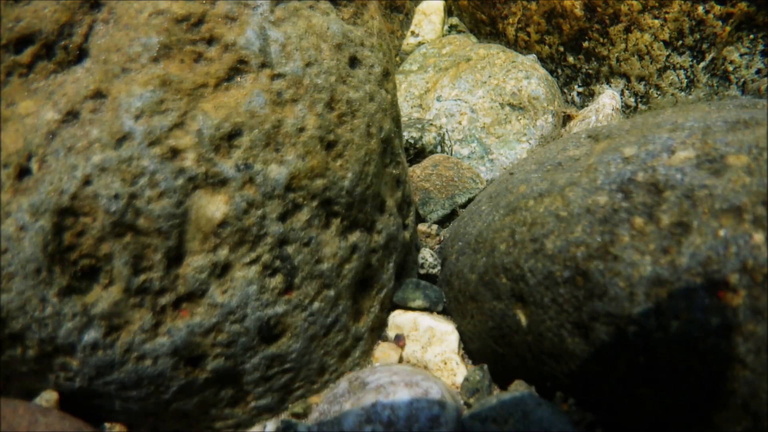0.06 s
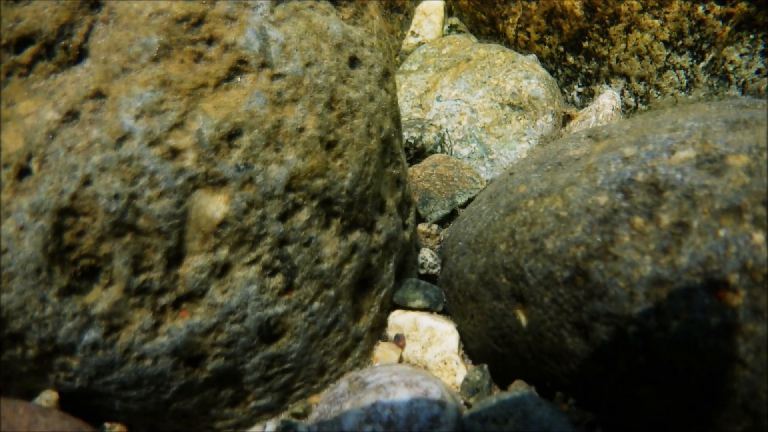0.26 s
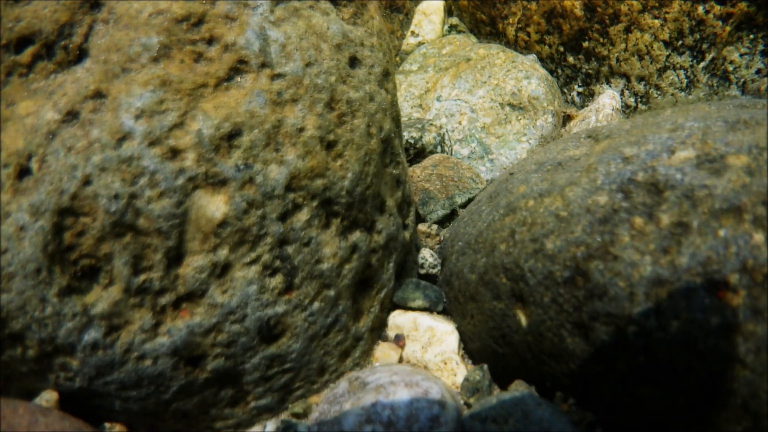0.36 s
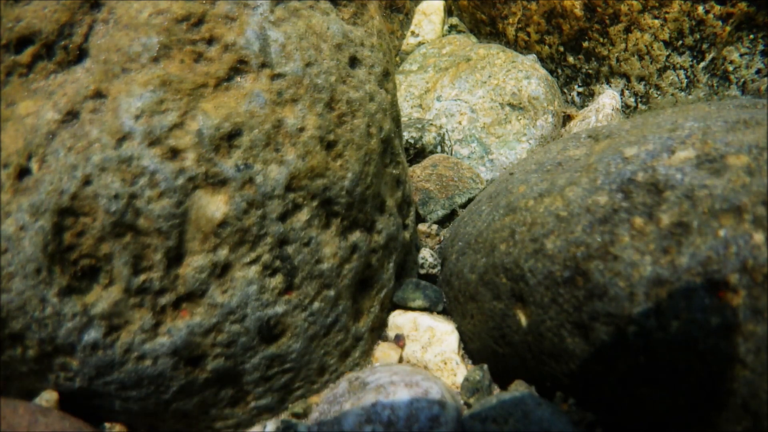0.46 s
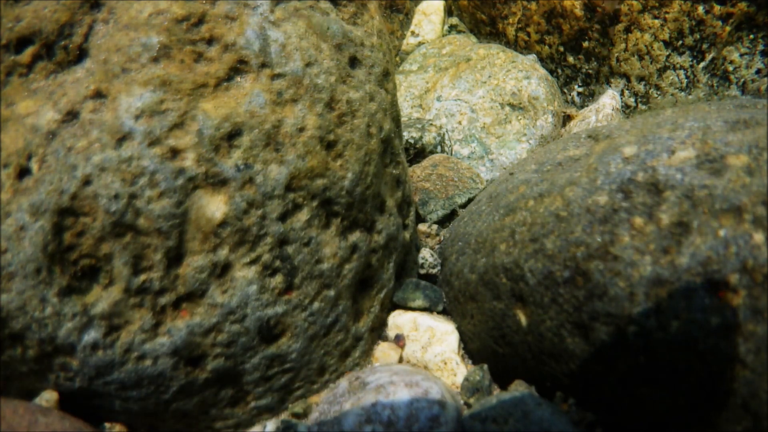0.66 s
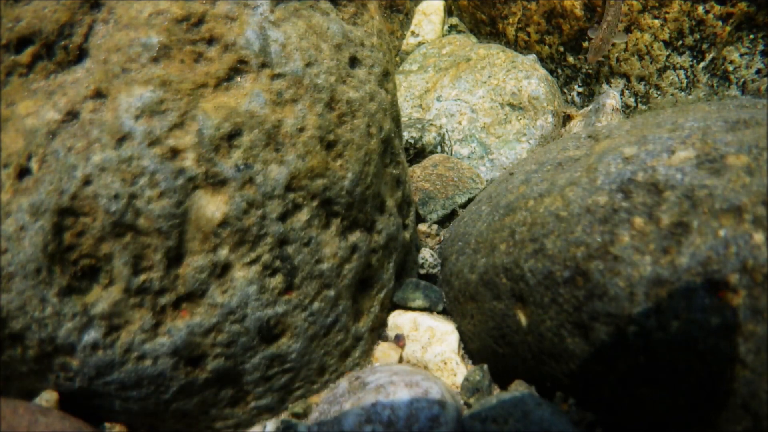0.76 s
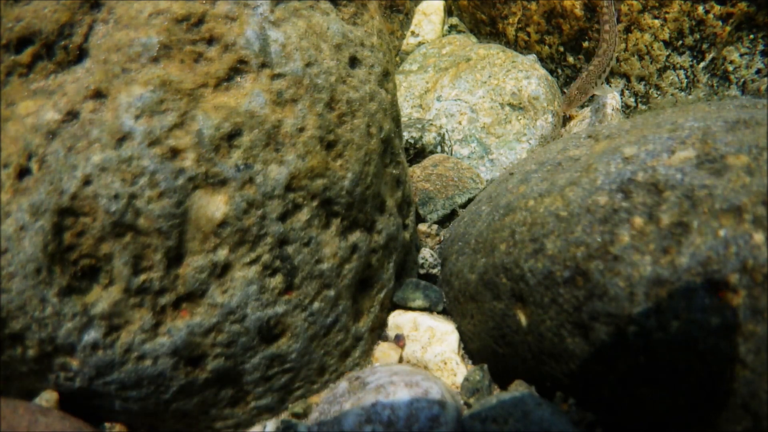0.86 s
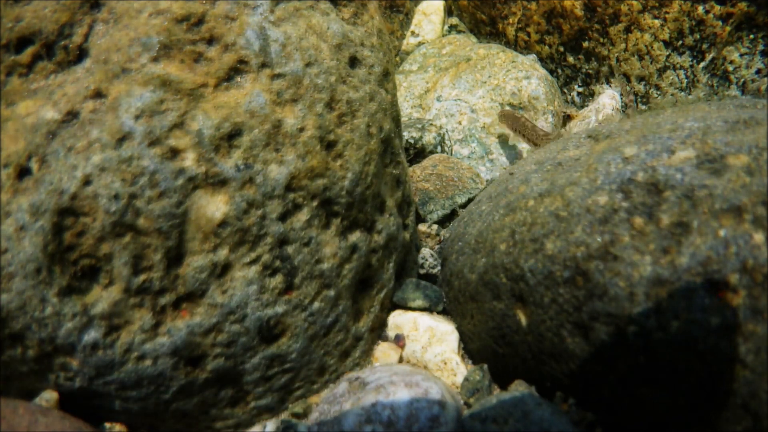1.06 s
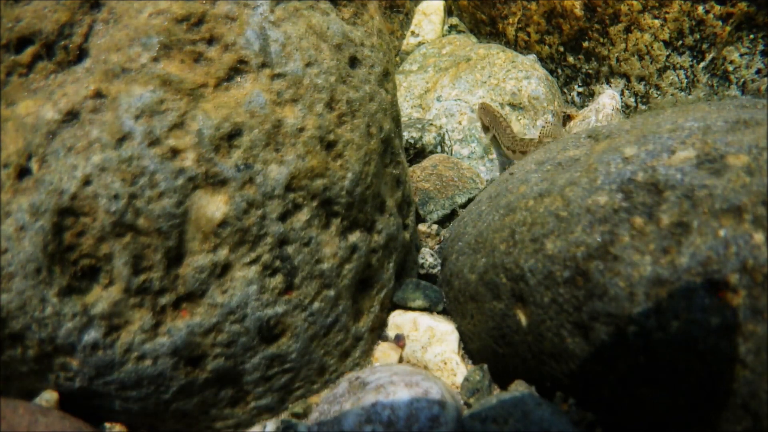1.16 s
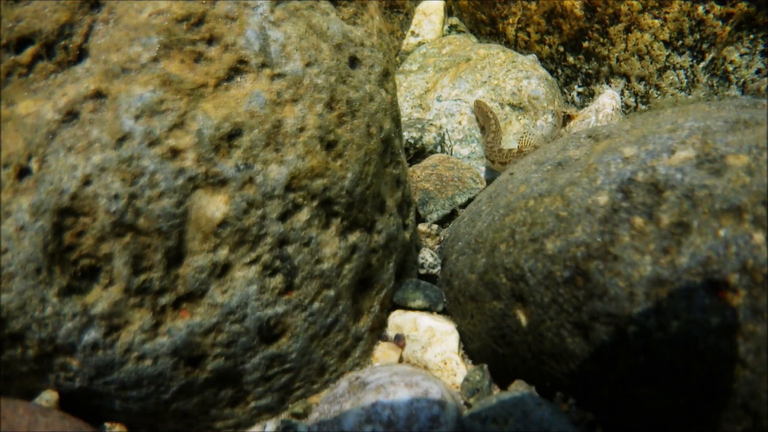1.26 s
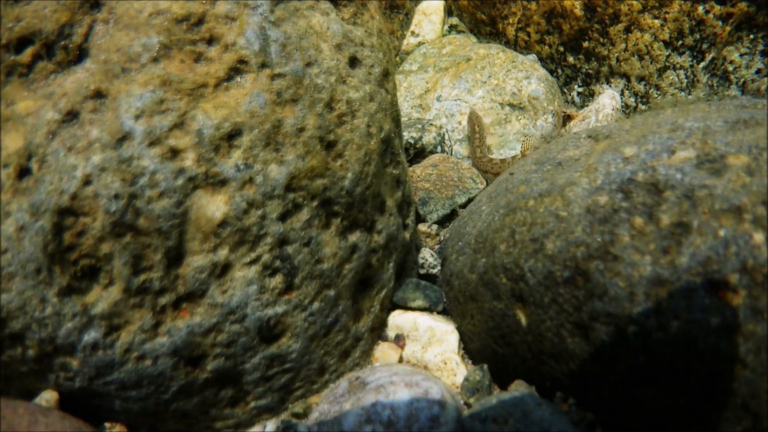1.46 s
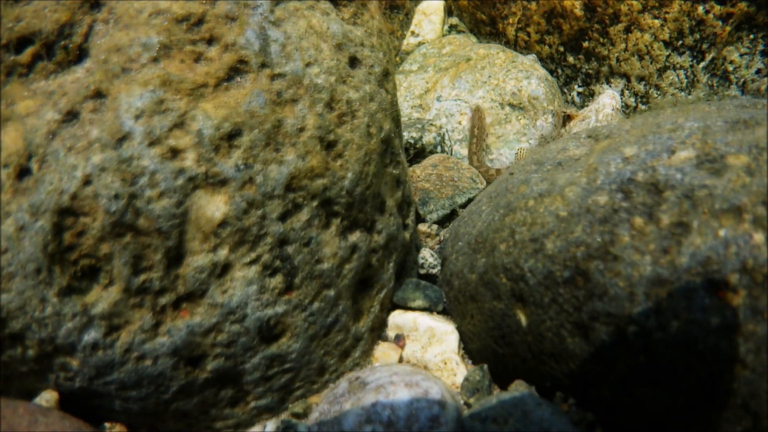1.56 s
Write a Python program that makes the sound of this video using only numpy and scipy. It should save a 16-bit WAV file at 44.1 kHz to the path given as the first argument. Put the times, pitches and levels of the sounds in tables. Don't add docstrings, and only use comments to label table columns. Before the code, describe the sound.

Stream current flows underwater, a steady, dull low rush with wobbling gurgles pressed close against enclosed stereo microphones. At about 0.22 seconds a stone knocks the housing hard with a short, deep thump. From 0.5 to 0.6 a looser rattle makes the thin shell ring briefly. The level drops slightly near 0.8; soft bumps, faint hiss and very weak high whines remain until about 1.6.

```python
import sys
import numpy as np
from scipy import signal
from scipy.fft import rfft, irfft, next_fast_len
from scipy.io import wavfile
from scipy.ndimage import uniform_filter1d, map_coordinates

SR = 44100
rng = np.random.default_rng(int(sys.argv[2]) if len(sys.argv) > 2 else 0)


def decibels_to_gain(level_db):
    exponent = np.asarray(level_db, float) / 20
    return 10 ** exponent


def dump(signal):
    limited = np.clip(np.atleast_2d(signal).T, -1, 1)
    pcm = np.round(limited * 32767).astype(np.int16)
    wavfile.write(sys.argv[1], SR, pcm)


N = 70560

# time in seconds, level in dB.
FLOW = [(0, -45.5), (.4, -44.5), (.8, -45), (1.2, -45), (1.6, -43)]
# frequency in Hz, density in dB per Hz.
RUSH_SPECTRUM = [(25, -11), (90, -21), (190, -8), (255, 1), (330, -1.5), (560, -7), (700, -23.5),
                 (1200, -43.5)]
# frequency in Hz, left-right likeness from -1 to 1.
RUSH_ALIKE = [(60, 1), (130, 0.77), (290, 0.95), (640, 0.66), (900, 0.17)]
# highest crest in seconds, peak in dB, pitch in Hz, rise and fall in seconds.
BUMPS = [(.001, -34, 240, .002, .006), (.085, -36, 330, .004, .007), (.1078, -35, 400, .007, .005),
         (.2105, -30, 250, .007, .008), (.2233, -21, 253, .0058, .004), (.2312, -20.5, 253, .008, .0085),
         (.2245, -36, 435, .004, .012), (.4912, -29, 295, .012, .006), (.5075, -31, 250, .008, .003),
         (.5225, -33, 235, .007, .006), (.5353, -26, 226, .01, .004), (.5395, -31, 450, .005, .008),
         (.557, -29, 300, .008, .009), (.583, -26, 312, .01, .007), (.6935, -36, 270, .003, .006),
         (.713, -37, 320, .007, .004), (.7222, -39, 280, .003, .006), (.7825, -38, 300, .003, .007),
         (.801, -38, 300, .004, .005), (1.097, -35.5, 340, .009, .007), (1.481, -36, 480, .006, .006),
         (1.574, -34, 300, .012, .006), (1.265, -37, 270, .008, .01)]
# start in seconds, thump level in dB, shell ring level in dB.
CONTACTS = [
    (.2216, -29, -38),
    (.5268, -45, -33),
    (.568, -42, -50),
]
# frequency in Hz, level in dB, 60 dB decay in seconds.
THUMP_MODES = [(98, -2, 0.063), (130, -0.5, 0.064), (168, 4.5, 0.063)]
# frequency in Hz, level in dB, 60 dB decay in seconds.
SHELL_MODES = [(915, 0, .045), (1050, -2, .04), (780, -5, .035), (1180, -8, .03)]
# frequency in Hz, density in dB per Hz.
HISS_SPECTRUM = [(440, -36), (750, 0.5), (950, -1.5), (1900, -7), (3900, -15.5), (7000, -15.5),
                 (11600, -13), (15000, -16.5)]
# frequency in Hz, left-right likeness from -1 to 1.
HISS_ALIKE = [(750, -0.18), (1400, 0.059), (5000, -0.14)]
# frequency in Hz, level in dB rms.
WHINES = [(11329, -81), (12000, -88), (12546, -88)]

RUSH_PAN_DB, BUMP_PAN_DB, THUMP_PAN_DB, HISS_PAN_DB = -1.1, -.7, -6, -1.5
GURGLE_DB, GURGLE_HZ, GURGLE_SPREAD = -7, 337.8, 0.282
GURGLE_CYCLES, GURGLE_SIZES_DB, GURGLE_RISE = 2.5, 1.5, 0.098
ROCK_DB, ROCK_LATE_S = -14, .004
THUMP_RISE_S, SHELL_RISE_S = .0015, .002
SHELL_LEFT = -.15
HISS_DB = -54
STEP_S, STEP_DB, STEP_TAKES_S = .82, -3.4, .015
LOW_CUT_HZ, TOP_HZ, TOP_FADE_HZ = 92, 15480, 170


def unit(x):
    return x / np.sqrt(np.mean(x ** 2) + 1e-20)


def along(points, hz):
    f, v = np.transpose(points)
    return np.interp(np.log(hz + 1), np.log(f + 1), v)


def wobble(rate):
    knots = rng.standard_normal(int(N * rate / SR) + 4)
    return map_coordinates(knots, [np.arange(N) * rate / SR])


def pan(db):
    return decibels_to_gain(np.array([[db / 2], [-db / 2]]))


def noise(spectrum, alike, patchy_db):
    z = signal.stft(rng.standard_normal((2, N)), nperseg=1024)[2]
    field = uniform_filter1d(rng.standard_normal(z.shape[1:]), size=5, axis=0)
    field = uniform_filter1d(field, size=4, axis=1)
    pair = signal.istft(z * decibels_to_gain(patchy_db * unit(field)), nperseg=1024)[1][:, :N]
    m = next_fast_len(N + 8192)
    hz = np.fft.rfftfreq(m, 1 / SR)
    turn = np.arccos(np.clip(along(alike, hz), -1, 1)) / 2
    coloured = rfft(pair, m) * decibels_to_gain(along(spectrum, hz))
    mid, side = irfft(coloured * [np.cos(turn), np.sin(turn)], m)[:, :N]
    return unit(np.array([mid + side, mid - side]))


def current():
    flow_db = np.interp(np.arange(N) / SR, *np.transpose(FLOW))
    flow_db = flow_db + 0.35 * wobble(6.3) + 0.72 * wobble(29.94)
    rush = noise(RUSH_SPECTRUM, RUSH_ALIKE, patchy_db=0.83)
    water = unit(rush + decibels_to_gain(GURGLE_DB) * gurgles(count=600))
    return pan(RUSH_PAN_DB) * decibels_to_gain(flow_db) * water


def gurgles(count):
    u, g = rng.random((count, 2)), rng.standard_normal((count, 2))
    hz = GURGLE_HZ * np.exp(GURGLE_SPREAD * np.clip(g[:, :1], -1.6, 1.8))
    age = np.arange(2048) / SR * hz / GURGLE_CYCLES
    phase = 2 * np.pi * GURGLE_CYCLES * age * (1 + GURGLE_RISE * age)
    wave = age * np.exp(-2 * age) * np.sin(phase)
    wave *= decibels_to_gain(GURGLE_SIZES_DB * u[:, 1:])
    start = (u[:, :1] * N).astype(int)
    at = (start + np.arange(2048)).ravel() % N
    lean_db = 1.1 * g[:, 1:]
    sides = [np.bincount(at, (wave * decibels_to_gain(sign * lean_db)).ravel(), N) for sign in (1, -1)]
    return unit(np.array(sides))


def contacts():
    t = np.arange(N) / SR
    thump = sum(decibels_to_gain(low) * ring(THUMP_MODES, t - s, THUMP_RISE_S) for s, low, _ in CONTACTS)
    shell = sum(decibels_to_gain(high) * ring(SHELL_MODES, t - s, SHELL_RISE_S) for s, _, high in CONTACTS)
    return pan(THUMP_PAN_DB) * thump + np.array([[SHELL_LEFT], [1]]) * shell


def ring(modes, t, rise):
    t = np.maximum(t, 0)
    tone = sum(decibels_to_gain(db - 60 * t / t60) * np.sin(2 * np.pi * hz * t) for hz, db, t60 in modes)
    return tone * (1 - np.exp(-t / rise))


def bumps():
    s, db, hz, rise, fall = np.transpose(BUMPS)[..., None]
    chance = rng.random((len(BUMPS), 2))
    t = np.arange(N) / SR - s

    def shape(t):
        swell = np.cos(np.pi / 2 * np.clip(t / rise, -1, 0))
        return decibels_to_gain(db) * np.where(t < 0, swell, np.exp(-(t / fall) ** 2))

    push = shape(t) * np.cos(2 * np.pi * hz * t)
    rock_gain = decibels_to_gain(ROCK_DB + 4 * (chance[:, :1] - 1.0))
    rock = rock_gain * shape(t - ROCK_LATE_S) * np.cos(2 * np.pi * (hz * t + chance[:, 1:]))
    return pan(BUMP_PAN_DB) * push.sum(0) + [[1], [-1]] * rock.sum(0)


def electronics():
    t = np.arange(N) / SR
    whine = 0
    for hz, db in WHINES:
        level = np.sqrt(2) * decibels_to_gain(db + 4.0 * wobble(13))
        whine = whine + level * np.sin(2 * np.pi * hz * t + 0.69 * wobble(15))
    hiss = decibels_to_gain(HISS_DB + 0.13 * wobble(5.8)) * noise(HISS_SPECTRUM, HISS_ALIKE, patchy_db=0.3)
    return pan(HISS_PAN_DB) * hiss + whine


def scene():
    return current() + contacts() + bumps() + electronics()


def top_cut(x):
    return signal.sosfilt(signal.butter(12, 15930, fs=SR, output="sos"), x)


def record(dry):
    progress = np.clip((np.arange(N) / SR - STEP_S) / STEP_TAKES_S + .5, 0, 1)
    m = next_fast_len(N + 8192)
    hz = np.fft.rfftfreq(m, 1 / SR) + 1e-3
    low_cut = 1 / np.sqrt(1 + (LOW_CUT_HZ / hz) ** 6)
    band = low_cut / (1 + np.exp((hz - TOP_HZ) / TOP_FADE_HZ))
    mix = irfft(rfft(dry * decibels_to_gain(STEP_DB * progress), m) * band, m)[:, :N]
    return top_cut(mix)


dry = scene()
out = record(dry)
dump(out)
```